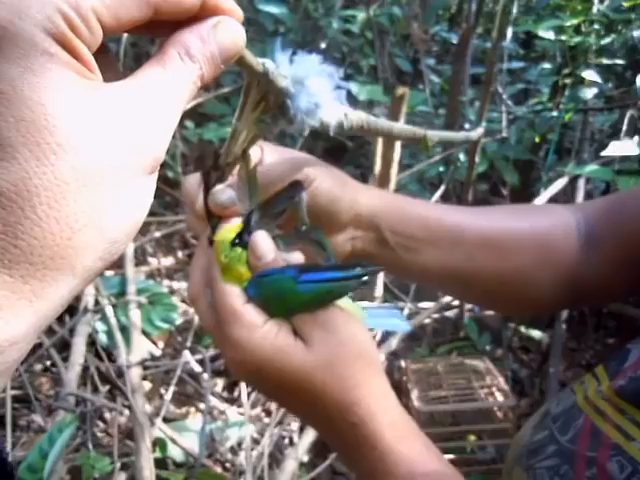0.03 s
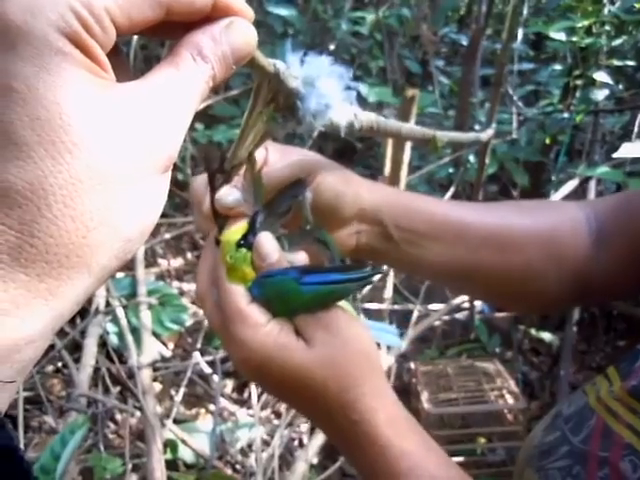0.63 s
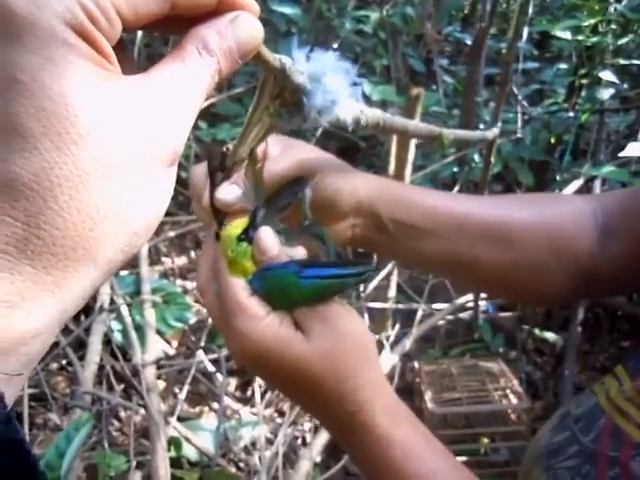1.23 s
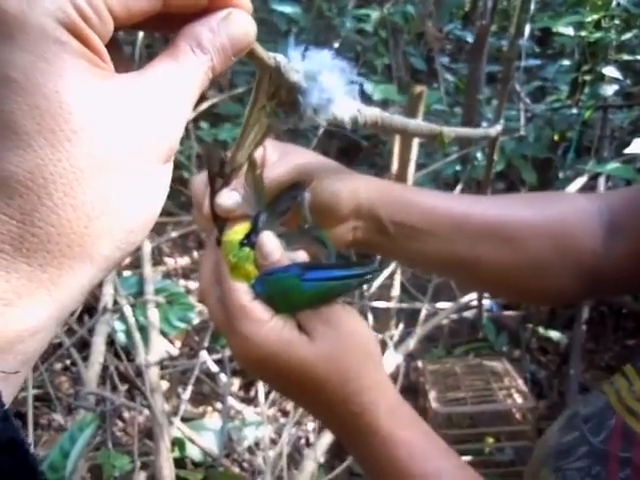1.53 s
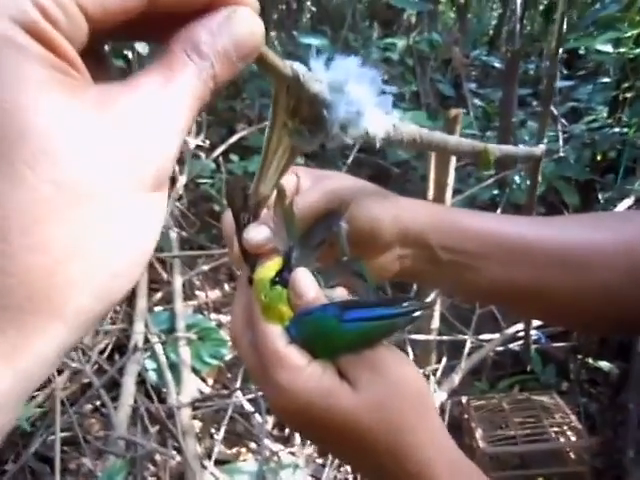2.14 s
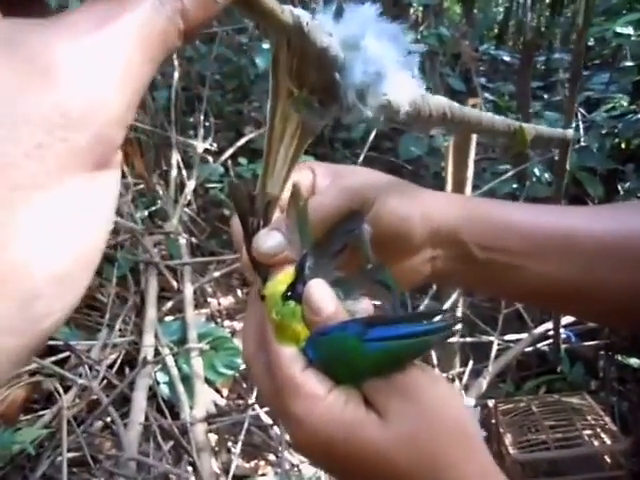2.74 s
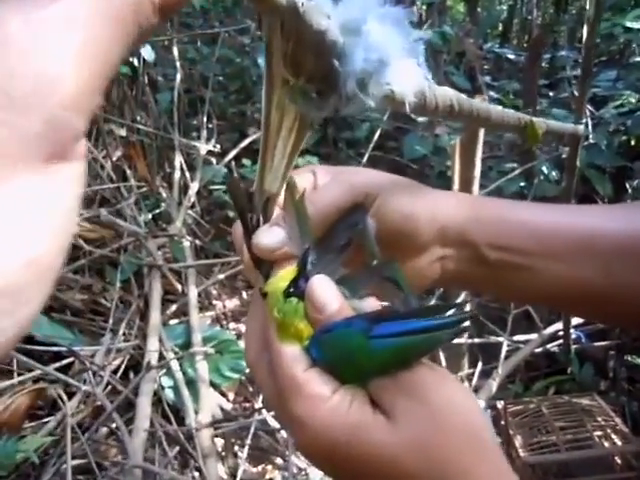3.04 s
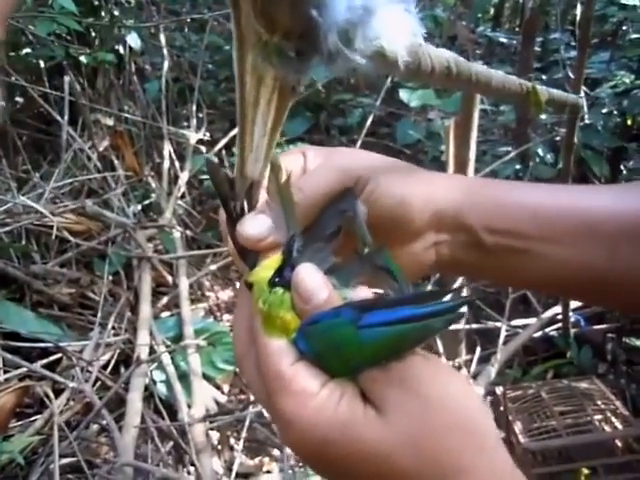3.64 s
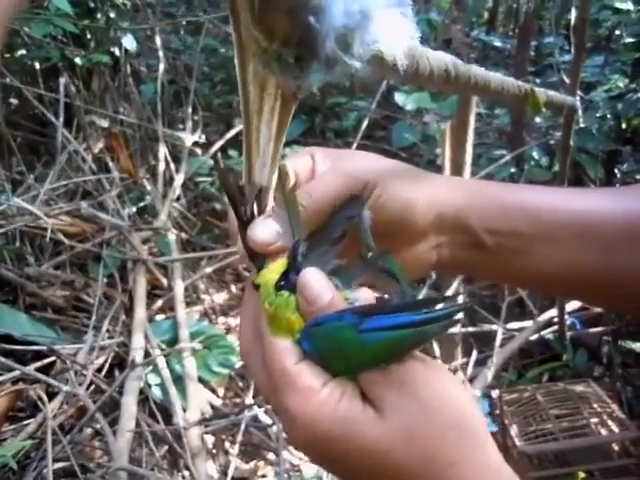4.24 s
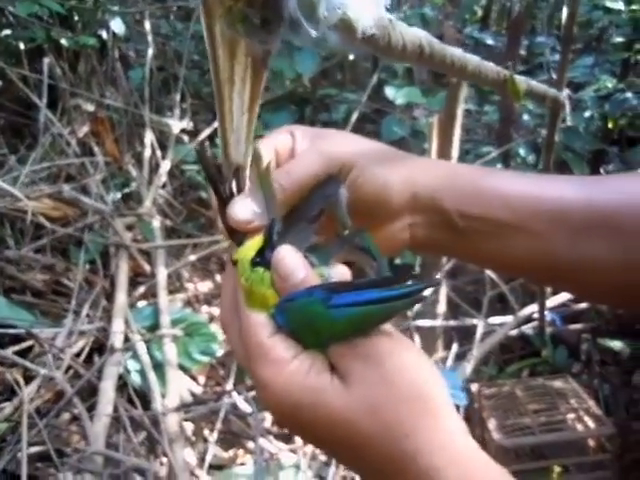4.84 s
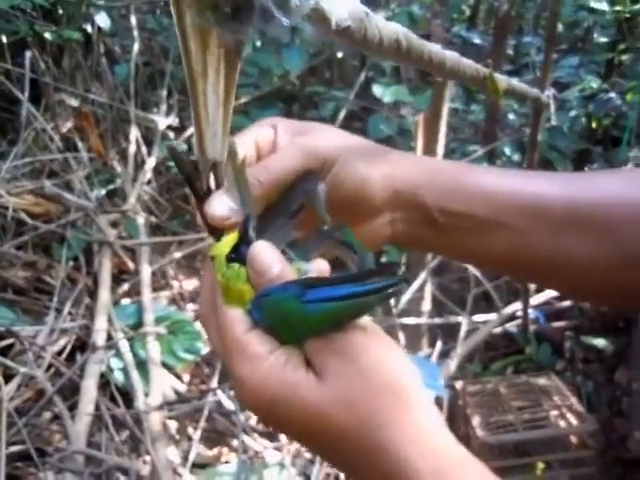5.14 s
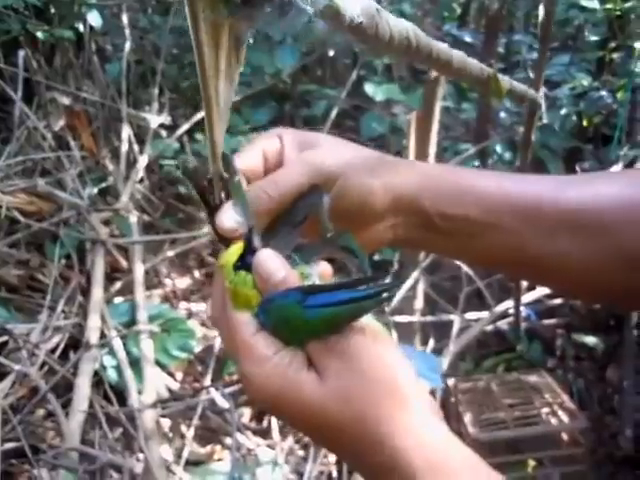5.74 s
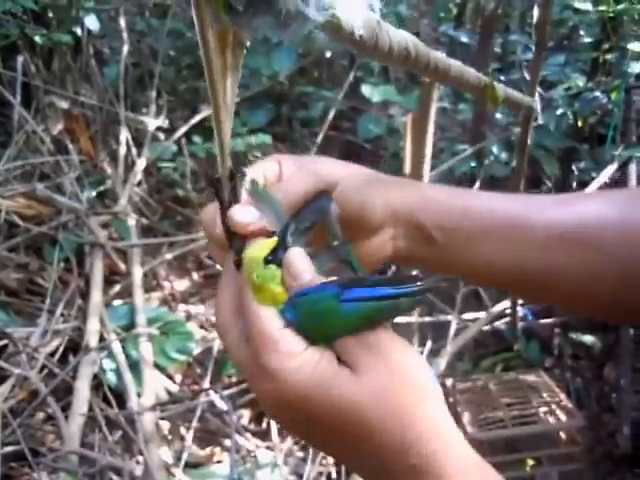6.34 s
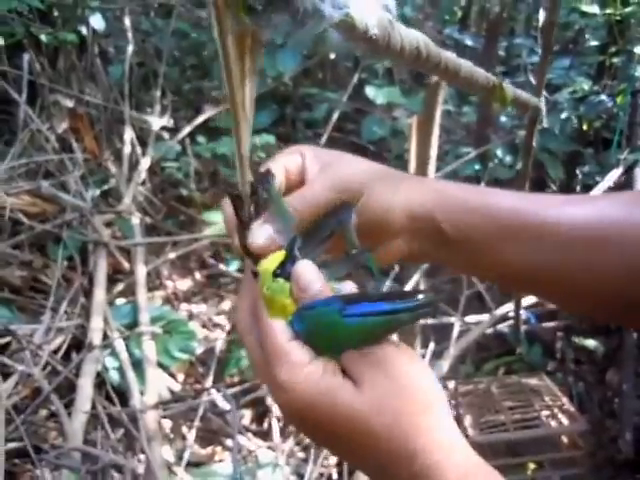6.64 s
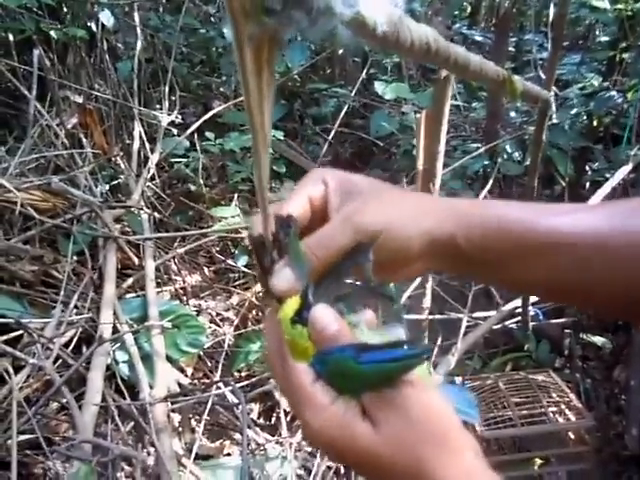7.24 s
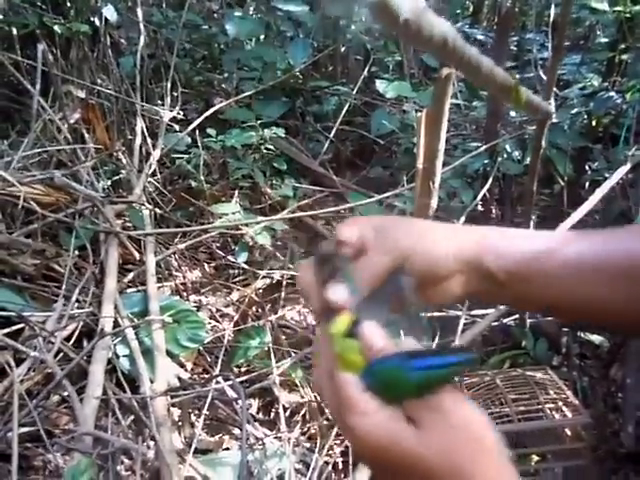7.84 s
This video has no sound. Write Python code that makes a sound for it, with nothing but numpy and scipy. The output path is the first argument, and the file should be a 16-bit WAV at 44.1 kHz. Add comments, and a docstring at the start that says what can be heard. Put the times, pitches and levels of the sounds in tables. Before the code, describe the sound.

A small bird chirps close by over a steady, high cicada drone in a forest, with light ticks and twig snaps.

```python
"""Cicadas drone all around in forest undergrowth, their tymbal resonances blurring over air, hiss and
the narrow notes of single insects. A small bird held in the hand gives six chirps from its syrinx,
first quavering, then higher and clear; trunks and leaves scatter them back. Another bird repeats
double chips, fingers working at a snare excite light ticks and twig snaps, the last one sharp,
and far birds whistle, heard mostly as scattered sound."""
import sys
import numpy as np
from scipy import signal
from scipy.io import wavfile

SR = 44100
rng = np.random.default_rng(int(sys.argv[2]) if len(sys.argv) > 2 else 0)


def wav_out(sig):
    """Save sig, one row per channel (or a flat mono array), as 16-bit PCM at SR to the path in sys.argv[1]."""
    wavfile.write(sys.argv[1], SR, np.round(np.clip(np.atleast_2d(sig).T, -1, 1) * 32767).astype(np.int16))


N = 356283
TIME = np.arange(N) / SR

# width of the diffuse field: f/Hz, side minus mid/dB
FIELD_WIDTH = [(60, -14), (92, -9.5), (140, -7.5), (210, -9.5), (330, -4), (500, -3.5), (770, -2.5),
               (1170, -3), (1790, -2), (2740, -0.5), (4180, -4), (6390, -8.5), (9770, 0), (14900, 0)]
# its imbalance: f/Hz, left minus right/dB
FIELD_BALANCE = [(60, -1.5), (700, -1), (1200, 0), (2000, 0), (2900, -1), (3300, 3.5), (3900, -0.5),
                 (5500, -1.5), (7700, -3.5), (8500, -1), (9600, 4.5), (11500, 0)]
# envelope of the cicada chorus: t/s, low band level/dB, high band level/dB
CHORUS_LEVELS = [(.1, -49, -39), (1.099, -45.5, -41), (1.9, -46, -40), (2.601, -45.5, -42),
                 (3.8, -44, -42.5), (5.2, -44, -43.5), (6.8, -45.5, -40.5), (7.55, -43, -45),
                 (7.75, -56, -41), (8.1, -44.5, -48.5)]
# tymbal resonances of each band: f/Hz, bandwidth/Hz, relative level/dB
LOW_TYMBALS = [(6552, 175, -3), (7080, 820, -3)]
HIGH_TYMBALS = [(7240, 720, -3.5), (7650, 340, 0.5)]
# spectra of still air with far insects, and of the hiss: f/Hz, relative density/dB
AIR_SPECTRUM = [(12, -39), (20, 5.5), (38, -3.5), (54, -8), (71, -3.5), (136, -6.5), (531, -13), (576, -15),
                (736, -16.5), (1270, -15.5), (1440, -31), (2040, -21.5), (2600, -6), (3380, -36),
                (5720, -120)]
HISS_SPECTRUM = [(2000, -19), (2700, -7), (3400, -5.5), (3950, -15.5), (4650, -5.5), (5200, -8.5),
                 (6300, -4), (8000, -2), (8700, -8.5), (9600, -6), (10800, -14), (12500, -18), (14300, -12)]
# single insects: start/s, end/s, f/Hz, bandwidth/Hz, level/dB, pulse rate/Hz, modulation depth (0-1)
INSECT_NOTES = [(1.85, 4.15, 5710, 130, -49.7, 8, .1), (3.6, 5.1, 5920, 70, -54, 8, .1),
                (4.9, 6.45, 5840, 90, -49.5, 30, .5), (6.3, 7.25, 5590, 90, -56.5, 8, .2),
                (0, 8.1, 6705, 25, -54, 8, .1), (4.25, 5.42, 4860, 140, -54, 8.2, .6),
                (2.78, 3.52, 7530, 240, -41.5, 8, .1), (4.15, 4.92, 7570, 300, -42.5, 8, .1),
                (5.7, 8.1, 6420, 60, -53, 8, .1), (1.9, 3.7, 6360, 110, -52, 8, .1)]
# the held bird's notes, two each for the third and fourth chirps: t/s, length/s, f/Hz, scoop/Hz,
# scoop time/s, sag/(Hz/s), final drop/Hz, attack/s, early level/dB, late level/dB, quaver (0-1)
BIRD_NOTES = [(0.406, 0.24, 2475, 700, 0.066, 1300, 60, 0.068, -31.5, -29, 0.75),
              (0.774, 0.22, 2468, 698, .058, 1100, 60, 0.056, -27, -27, 0.7),
              (1.104, 0.081, 2710, 850, 0.027, 0, 150, 0.029, -22, -20, 0.11),
              (1.172, .068, 2815, 402, 0.033, 1200, 80, 0.014, -18.5, -23.5, .4),
              (1.336, .086, 2780, 906, .036, 0, 150, 0.039, -19.5, -20.5, 0.3),
              (1.416, .066, 2816, 422, 0.0263, 801, 80, 0.011, -17.5, -29, 0.56),
              (1.625, 0.087, 3114, 720, 0.066, 0, 480, 0.019, -24.5, -9.5, 0.13),
              (1.975, .100, 3190, 667, .066, 0, 110.8, 0.071, -15.5, -10.5, 0.07)]
# cracks in its voice: t/s, length/s, jump/Hz
VOICE_CRACKS = [(0.468, 0.014, 196.5), (0.527, 0.016, 178), (0.605, 0.011, -110), (0.823, 0.01, 152.5),
                (0.848, 0.016, 155), (.961, 0.0086, -120), (1.15, .028, 560), (1.2, 0.0071, 400),
                (1.387, .028, 523)]
# it turns its head: t/s, left minus right/dB
HEAD_TURNS = [(.6, -.3), (1.35, -2), (1.68, 1.6), (2.05, 1)]
# reflections off the ground and near trunks: delay/s, left level/dB, right level/dB
REFLECTIONS = [(.0071, -17, -14), (.0205, -17, -18), (.058, -20, -18)]
# impulses of light ticks at the snare and of dry twig snaps: t/s, level/dB
TICK_HITS = [(3.804, -36.5), (4.0625, -38), (6.3703, -30), (6.5061, -40.5), (6.896, -42)]
SNAP_HITS = [(3.93, -17.5), (4.297, -25), (5.657, -21.5), (7.581, -24), (7.5958, -4)]
# the modes they excite: f/Hz, relative level/dB, T60/s
SNARE_MODES = [(1196, 6, 0.015), (1338, -1, 0.04), (1720, -14.5, .015), (2380, -1, .018),
               (2700, -1.5, 0.016), (3630, -4, 0.011)]
TWIG_MODES = [(1040, -27, 0.0051), (2250, -22, 0.0076), (4000, -18, 0.0015), (5600, -14.5, 0.0036),
              (7340, -2.5, 0.0028), (8920, 2.5, 0.0012), (12100, -1, 0.00077)]
# a far bird's low falling notes: t/s, length/s, level/dB
FALLING_NOTES = [(6.093, 0.194, -51.5), (6.70, 0.108, -52.5)]
# their contour: f/Hz at start, middle and end
FALLING_HZ = [1030, 895, 833]
# another's upward slurs: t/s, length/s, limiting f/Hz, level/dB
RISING_SLURS = [(6.944, 0.098, 6400, -40), (7.213, 0.15, 7100, -37), (7.454, 0.061, 6600, -42.5),
                (7.885, .09, 6220, -45)]


def from_db(db):
    return 10 ** (np.asarray(db) / 20)


def rms_one(x):
    return x / np.sqrt(np.mean(x ** 2) + 1e-20)


def at_hz(points, hz):
    """Interpolation on a logarithmic frequency axis."""
    freqs, values = np.transpose(points)
    return np.interp(np.log(hz), np.log(freqs), values)


def drift(rate_hz):
    """Low-passed noise: a random fluctuation of unit rms."""
    r = np.exp(-40 * np.pi * rate_hz / SR)
    slow = signal.lfilter([1], [1, -2 * r, r * r], rng.standard_normal(N // 20 + 2002))[2000:]
    return np.interp(np.arange(N) / 20, np.arange(len(slow)), rms_one(slow))


def gate(start, end, fade):
    """Trapezoidal envelope between start and end."""
    return np.clip(np.minimum(TIME - start, end - TIME) / fade, 0, 1)


def ease(t, span):
    """Parabolic fall from one to zero, fast at first."""
    return np.maximum(1 - t / span, 0) ** 2


def late(x, delay):
    """Propagation delay in seconds."""
    return np.interp(TIME - delay, TIME, x, left=0)


def noise_band(low, high):
    """A diffuse field is partly coherent between the ears: one stereo band of unit rms."""
    sos = signal.butter(2, [low, min(high, .45 * SR)], "band", fs=SR, output="sos")
    mid, side = signal.sosfilt(sos, rng.standard_normal((2, N)))
    hz, sides = np.sqrt(low * high), np.array([[1], [-1]])
    stereo = mid + from_db(at_hz(FIELD_WIDTH, hz)) * side * sides
    return rms_one(stereo * from_db(sides * at_hz(FIELD_BALANCE, hz) / 2))


def cicadas(resonances, throb_db):
    """Incoherent summation: the clicks of many tymbals blur into throbbing noise at their resonances."""
    return rms_one(sum(noise_band(hz - width / 2, hz + width / 2) * from_db(db + throb_db * drift(31))
                       for hz, width, db in resonances))


def forest_noise(spectrum, flicker_db, bands):
    """Band power is density times bandwidth; each band flickers and the sum has unit rms."""
    edges = np.geomspace(max(spectrum[0][0], 15), spectrum[-1][0], bands + 1)
    out = 0
    for low, high in zip(edges, edges[1:]):
        band = noise_band(low, high) * np.sqrt(high - low)
        out += band * from_db(at_hz(spectrum, np.sqrt(low * high)) + flicker_db * drift(11.7))
    return rms_one(out)


def insects():
    """Amplitude modulation of narrow-band noise: each nearer insect holds one pulsing note."""
    out = 0
    for start, end, hz, width, db, pulse_hz, depth in INSECT_NOTES:
        pulsing = 1 + depth * np.sin(2 * np.pi * pulse_hz * (TIME - start))
        envelope = from_db(db) * gate(start, end, fade=.12) * pulsing
        out += envelope * noise_band(hz - width / 2, hz + width / 2)
    return out


def chirp_contours():
    """Frequency and amplitude envelopes: notes scoop up, sag and drop; in an overlap the louder leads."""
    attack_db, release_db, tiring_db = 30.5, 14, 9.5
    release_s, drop_s = .031, .029
    hz, quaver, sounding = np.zeros((3, N))
    level_db = np.full(N, -np.inf)
    for start, length, pitch, scoop, glide, sag, drop, attack, early_db, late_db, shake in BIRD_NOTES:
        t = np.clip(TIME - start, 0, length)
        fall_hz = sag * np.maximum(t - glide, 0) + drop * ease(length - t, drop_s)
        note_hz = pitch - scoop * ease(t, glide) - fall_hz
        tiring = shake * np.sin(np.pi * (t / length) ** 2) ** 2   # weakens late, then rallies
        edges_db = attack_db * ease(t, attack) + release_db * ease(length - t, release_s)
        note_db = early_db + (late_db - early_db) * t / length - tiring_db * tiring - edges_db
        leads = (t > 0) & (t < length) & (note_db > level_db)
        hz[leads], level_db[leads], quaver[leads] = note_hz[leads], note_db[leads], shake
        sounding = np.maximum(sounding, gate(start, start + length, fade=.002))
    return hz, level_db, quaver, sounding


def voice_cracks():
    """Frequency jumps with overshoot: the pitch leaps, slides back past the note and recovers."""
    onset_s, recover_s, overshoot, full_strain_hz = .004, .012, .1194, 563
    leap_hz, strain = 0, 0
    for start, length, jump in VOICE_CRACKS:
        end = start + length
        stages = [start - onset_s, start, end, end + recover_s]
        leap_hz += jump * np.interp(TIME, stages, [0, 1, -overshoot, 0])
        strain += abs(jump) / full_strain_hz * gate(start - onset_s, end + onset_s, fade=onset_s)
    return leap_hz, np.clip(strain, 0, 1)


def syrinx():
    """Coupled modulation: under strain the syrinx flutters, shaking pitch and level together."""
    depth_hz, waver_hz, tremble_db, crack_loss_db, throb, rasp = 125, 12, 1.5, 4, .7, .18
    hz, level_db, quaver, sounding = chirp_contours()
    leap_hz, strain = voice_cracks()
    level_db -= crack_loss_db * np.maximum(strain - quaver, 0)
    quaver = np.maximum(quaver, strain)
    flutter_hz = (90 + 89.64 * strain) * (1 + .3 * drift(40))
    flutter = 2 * np.pi * np.cumsum(flutter_hz) / SR
    hz += leap_hz + quaver * (depth_hz * np.sin(flutter) + 40 * drift(146)) + waver_hz * drift(150)
    phase = 2 * np.pi * np.cumsum(hz) / SR
    amplitude = np.sqrt(2) * sounding * from_db(level_db + tremble_db * quaver * drift(99))
    amplitude *= 1 + quaver * (throb * np.cos(flutter) + rasp * drift(370))
    return amplitude * np.sin(phase), amplitude * np.sin(3 * phase)


def scatter(x, t60, coherence):
    """Multiple scattering: echoes off leaves and trunks decay exponentially, at unit power gain."""
    t, echoes_per_s = TIME[:SR], 1500
    arrivals = rng.standard_normal((2, SR)) * (rng.random((2, SR)) < echoes_per_s / SR)
    mid, side = arrivals * from_db(-60 * t / t60) * (t > .006)
    response = np.sqrt(1 + coherence) * mid + np.sqrt(1 - coherence) * side * [[1], [-1]]
    return signal.fftconvolve(x[None], rms_one(response) / np.sqrt(SR), axes=1)[:, :N]


def held_bird():
    """Superposition of paths: a near-pure whistle arrives directly, reflected and scattered."""
    whistle, third = syrinx()
    voice = whistle + from_db(-22.5) * third
    pan_db = np.interp(TIME, *np.transpose(HEAD_TURNS))
    direct = np.array([voice, late(voice, delay=1 / SR)]) * from_db(pan_db * [[.5], [-.5]])
    echoes = sum(late(whistle, delay) * from_db([[left], [right]]) for delay, left, right in REFLECTIONS)
    thicket = from_db(-10.5) * scatter(whistle, t60=.3, coherence=.65)
    # leaves absorb the higher notes
    dulled = signal.sosfilt(signal.butter(2, 2600, fs=SR, output="sos"), whistle)
    forest = from_db(-8.3) * scatter(dulled, t60=.62, coherence=.75)
    # the beak beams the third harmonic away, so it returns mostly off the leaves
    sheen = from_db([[-18.5], [-23.5]]) * scatter(third, t60=.42, coherence=.32)
    return direct + echoes + thicket + forest + sheen


def slur(start, length, pitches):
    """Phase is the integral of frequency: a soft-edged whistle glides through the pitches."""
    hz = np.interp(TIME, np.linspace(start, start + length, len(pitches)), pitches)
    return gate(start, start + length, fade=length / 4) * np.sin(2 * np.pi * np.cumsum(hz) / SR)


def chipping_bird():
    """Downward frequency sweeps: a bird in a bush gives seven pairs of chips, slowing and fading."""
    start_s, period_s, slowing_s, fade_db = 1.941, .1135, .0038, 4
    first = 0
    for k in range(7):
        onset = start_s + k * (period_s + slowing_s * (k - 1) / 2)
        first += from_db(-40.5 - fade_db * (k / 6) ** 2) * slur(onset, length=.016, pitches=[4800, 4400])
    pairs = first + late(first, delay=.029)
    return pairs + from_db(-8) * scatter(pairs, t60=.25, coherence=.6)


def strike(hits, modes):
    """Modal synthesis: each impulse rings every damped mode, with slightly random strength."""
    at, out = [round(s * SR) for s, db in hits], np.zeros(N)
    for k, (hz, mode_db, t60) in enumerate(modes):
        impulses = np.zeros(N) + 1e-18
        impulses[at] = from_db(np.array(hits)[:, 1] + mode_db + rng.normal(0, 1, len(at)))
        r, w = from_db(-60 / (t60 * SR)), 2 * np.pi * hz / SR
        out += (-1) ** k * signal.lfilter([0, np.sin(w)], [1, -2 * r * np.cos(w), r * r], impulses)
    return out


def fingers_at_snare():
    """Impulsive excitation: the snare ticks and dry twigs snap close by, a little to the left."""
    # fibres give way just before the last, sharpest snap
    splinters = [(SNAP_HITS[-1][0] - lead_s, -16.5) for lead_s in .009 * rng.random(4)]
    ticks = from_db(-.5) * strike(TICK_HITS, SNARE_MODES)
    snaps = strike(SNAP_HITS + splinters, TWIG_MODES)
    direct = ticks + np.array([snaps, late(snaps, delay=1 / SR)])
    return direct + from_db(-35) * scatter(ticks + snaps, t60=.2, coherence=.5)


def far_birds():
    """Beyond the critical distance, scattered sound outweighs the direct whistles."""
    calls = sum(from_db(db) * slur(start, length, FALLING_HZ) for start, length, db in FALLING_NOTES)
    from_hz, glide_s = 4500, .028
    for start, length, top_hz, db in RISING_SLURS:
        pitches = top_hz + (from_hz - top_hz) * np.exp(-TIME[TIME < length] / glide_s)
        calls += from_db(db) * slur(start, length, pitches)
    return .6 * calls + scatter(calls, t60=.4, coherence=.6)


def scene():
    """Sound pressures add linearly; air and hiss rise and sink with the chorus."""
    times, *levels = np.transpose(CHORUS_LEVELS)
    low_db, high_db = (np.interp(TIME, times, db) for db in levels)
    chorus = from_db(low_db) * cicadas(LOW_TYMBALS, throb_db=2)
    chorus += from_db(high_db) * cicadas(HIGH_TYMBALS, throb_db=1.5)
    swell_db = (low_db + high_db) / 2 - np.mean(low_db + high_db) / 2
    air = from_db(-46 + .38 * swell_db) * forest_noise(AIR_SPECTRUM, flicker_db=.83, bands=14)
    hiss = from_db(-44 + .67 * swell_db) * forest_noise(HISS_SPECTRUM, flicker_db=2.5, bands=22)
    return chorus + air + hiss + held_bird() + far_birds() + chipping_bird() + insects() + fingers_at_snare()


def record(dry):
    """Gating and band limiting: the sound starts a moment in, and a steep low-pass cuts the top."""
    start_s, cutoff_hz = .093, 14400
    return signal.sosfilt(signal.ellip(10, .1, 80, cutoff_hz, fs=SR, output="sos"), dry * (TIME > start_s))


dry = scene()
out = record(dry)
wav_out(out)
```